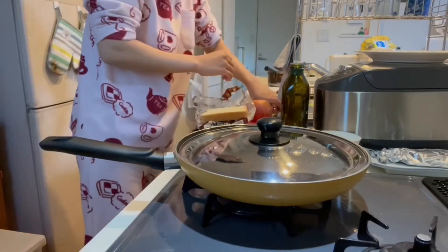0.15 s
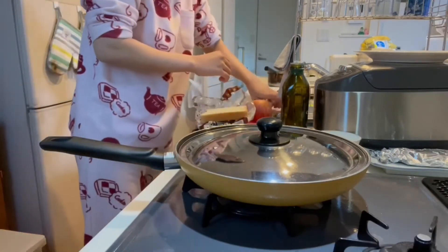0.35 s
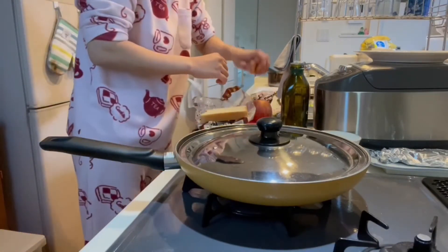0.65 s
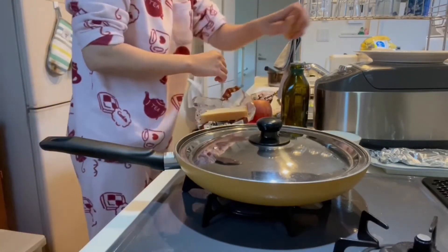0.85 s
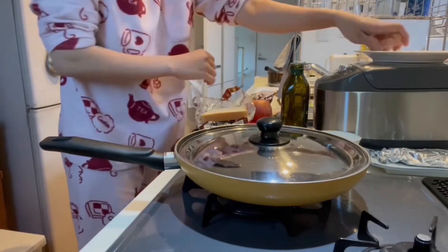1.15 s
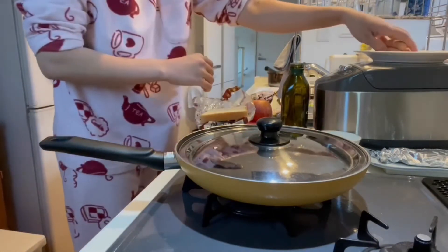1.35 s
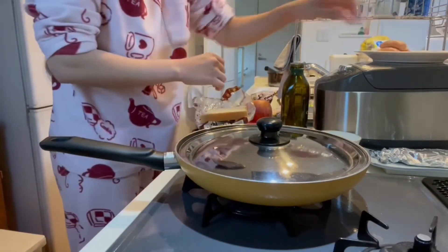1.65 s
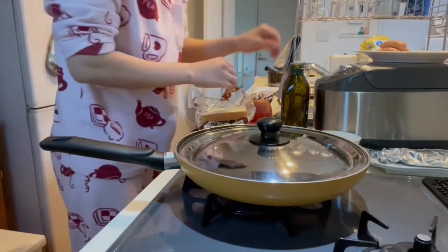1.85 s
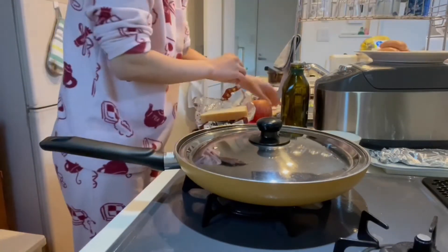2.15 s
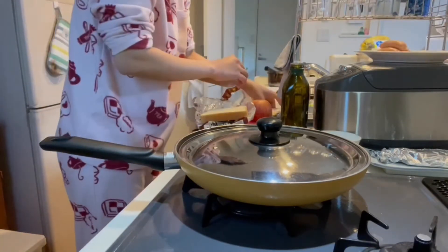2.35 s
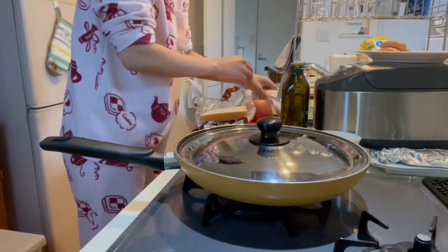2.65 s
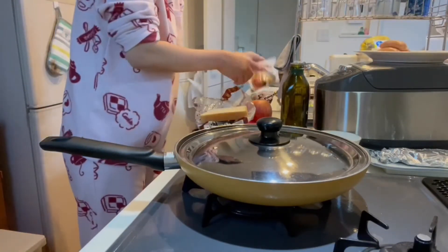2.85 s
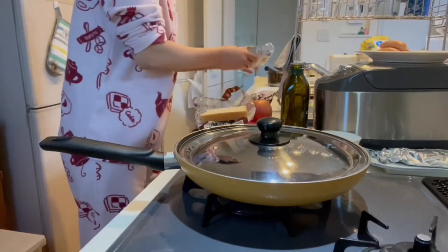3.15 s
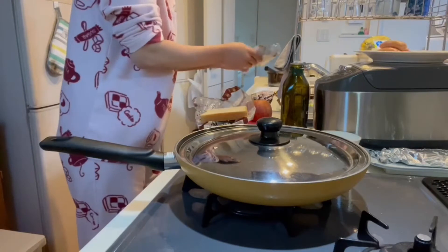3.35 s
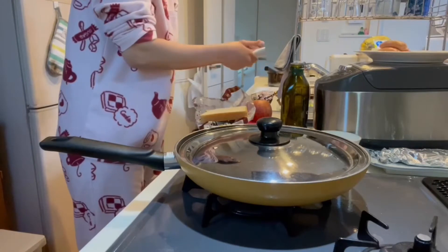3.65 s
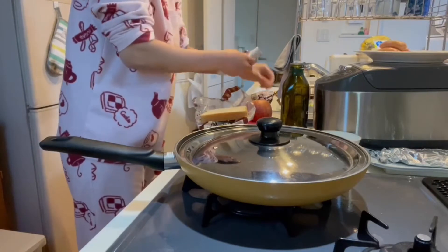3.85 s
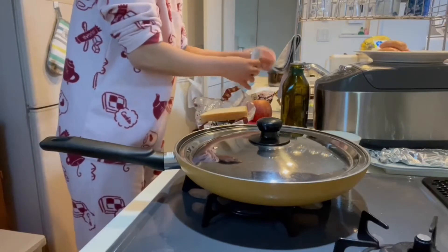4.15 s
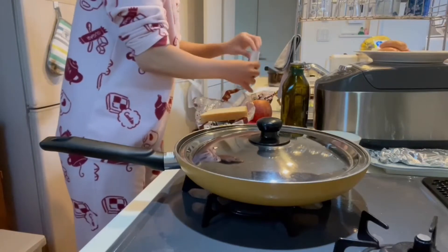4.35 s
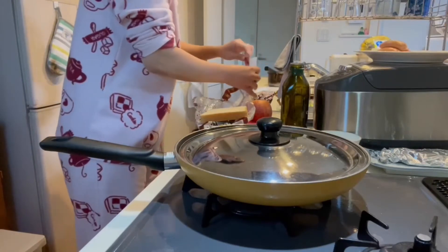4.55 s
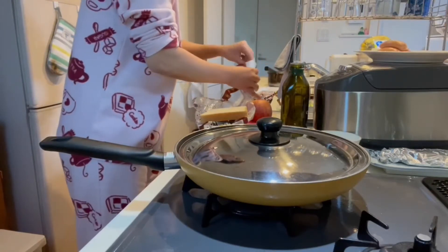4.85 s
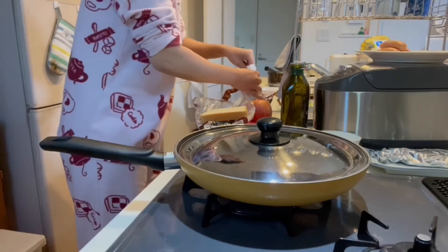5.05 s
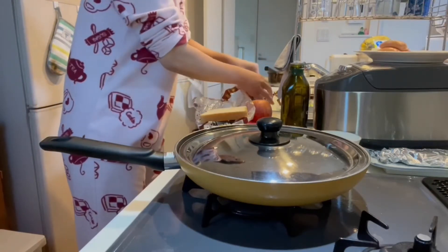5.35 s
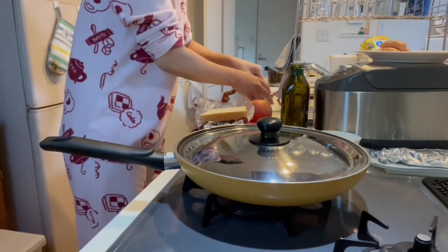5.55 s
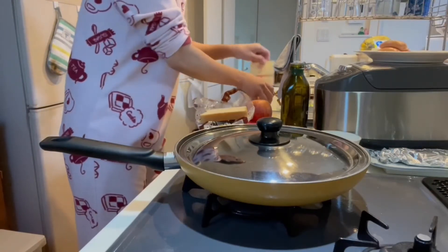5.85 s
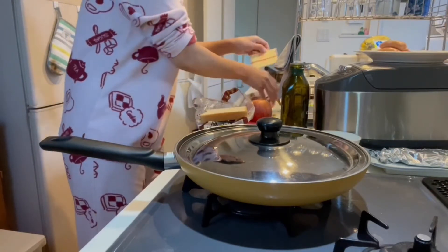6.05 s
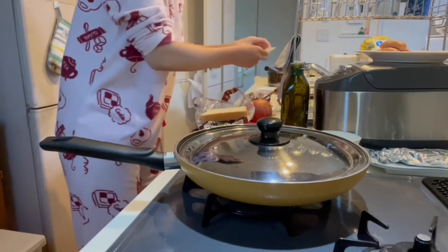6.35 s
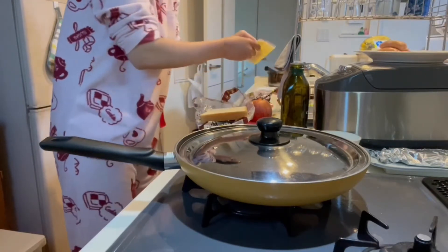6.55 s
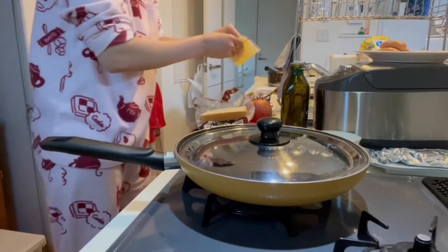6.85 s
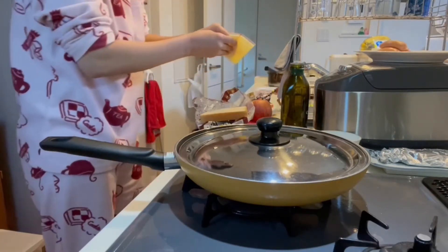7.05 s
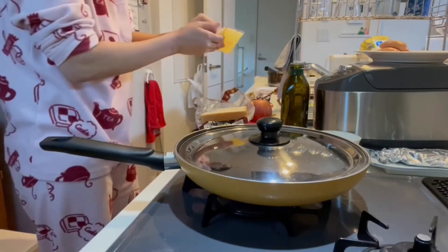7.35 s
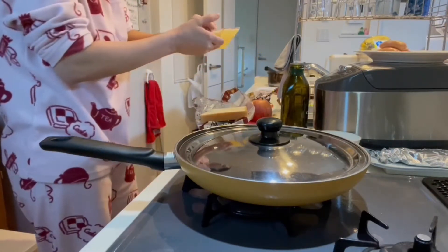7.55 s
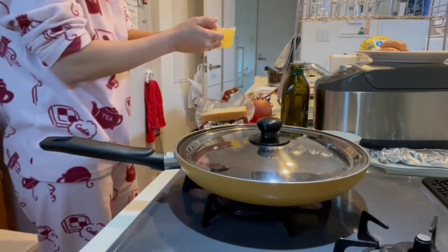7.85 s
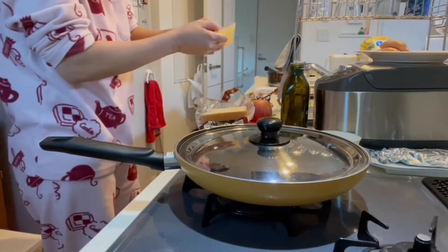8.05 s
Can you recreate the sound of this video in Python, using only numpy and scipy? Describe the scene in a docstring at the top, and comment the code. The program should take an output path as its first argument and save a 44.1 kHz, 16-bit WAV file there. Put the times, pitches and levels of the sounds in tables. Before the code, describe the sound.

Food sizzles quietly in a covered frying pan close to the microphones, a steady hiss dotted with small pops of fat. Beneath it run the low rumble of a gas flame and fan and an appliance hum. Soft thuds come just after 1 second, followed by a faint, brief low tone. From about 2 seconds, thin plastic wrapping rustles a metre behind the pan, snapping sharply around 2.4 and again from 3.1 to 3.4 seconds. Fat spits more clearly near 3.8 seconds. Lighter crinkling continues from 4 to 6 seconds, with small taps, a package dragged over the counter and a soft thud near 6. The handling then thins to a few crackles, and the faint low tone returns near 7.7. At about 8 seconds the wrapper tears open with crisp snaps. The kitchen sounds small, with a short echo.

```python
"""A small kitchen, heard through two spaced microphones close to a frying pan on a gas ring.
Food sizzles quietly under the glass lid: tiny bursts blur to a hiss, and single drops of fat spit.
A metre behind the pan a cook bends thin plastic wrapping, whose creases rustle and snap, and tears
it open at the very end. A package is shuffled about and things are set down with light taps and
soft thuds. Under it all lie the rumble of flame and fan and a low appliance hum."""
import sys
import numpy as np
from scipy import signal
from scipy.fft import rfft, irfft, next_fast_len
from scipy.io import wavfile

SR = 44100
rng = np.random.default_rng(int(sys.argv[2]) if len(sys.argv) > 2 else 0)


def transcribe(u):
    """Save the signal u as a 16-bit wav file named by the first command-line argument.

    u: samples, shape (n,) or (channels, n), limited to [-1, 1]; the rate is SR.
    q: integer samples, one column per channel.
    """
    v = np.clip(np.atleast_2d(u).T, -1, 1)
    q = np.round(v * 32767).astype(np.int16)
    wavfile.write(sys.argv[1], SR, q)


N = 361619
TIME = np.arange(N) / SR


# Colour of the sizzling hiss, with two notches cut into the treble at 8.3 and 12.8 kHz.
# Each row: frequency in Hz, relative level in dB.
SIZZLE_SPECTRUM = [(300, -9), (500, 1), (660, -18.5), (880, 1.5), (1150, 0), (1550, -7.5), (3000, -7.5),
                   (4500, -13), (6500, -12), (8300, -29.5), (10500, -12.5), (12800, -37), (14500, -24.5)]

def sizzle():
    """Countless tiny bursts blur to a hiss; small pops of fat tick above it at random."""
    hiss = scattered(crackle(per_s=2600, spread_db=3.0), decay_s=0.0027)
    ticks = np.zeros((2, N))
    for when, pitch, size in rng.random((36 * N // SR, 3)):  # 36 pops a second
        hz = 1200 * 6 ** pitch
        level_db = -55 + 10 * size ** 3 + at_hz(SIZZLE_SPECTRUM, hz)
        add(ticks, when * N / SR, from_db(level_db) * pop(hz))
    return from_db(-60.5) * coloured(hiss, SIZZLE_SPECTRUM) + ticks


# Fat spitting under the lid. Each row: start in seconds, relative level in dB, pitch in Hz.
FAT_SPITS = [(0.41, -50, 2500), (0.559, -50, 1910), (0.64, -49.5, 5270), (0.741, -55, 6940),
             (1.055, -49.5, 4600), (1.195, -52.5, 7260), (1.334, -45, 1860), (1.37, -45, 2580),
             (1.403, -47, 2200), (1.512, -51, 3450), (1.959, -49.5, 5300), (2.647, -43, 1850),
             (3.701, -39.5, 1930), (3.786, -36, 1620), (3.793, -41, 1530), (3.839, -46.5, 3350),
             (3.998, -46.5, 4460), (6.099, -44.5, 1870), (6.411, -51, 2500), (6.524, -42.5, 1070),
             (6.612, -53, 3530), (7.341, -50.5, 6100), (7.365, -52, 4950), (7.418, -51, 6200)]

def spits():
    """Larger bubbles burst one by one and stand clear of the hiss."""
    out = np.zeros((2, N))
    for start, level_db, hz in FAT_SPITS:
        add(out, start, from_db(level_db) * pop(hz))
    return out


def pop(hz, ring_s=0.0014, scatter_s=0.015, fade_db_per_s=850, crack_db=-8, count=4):
    """A bubble bursts: a dry crack with a brief ping in it, then weaker ones close behind."""
    t = TIME[:SR // 24]
    order = np.arange(count)
    jitter = rng.uniform(-0.494, 0.478, (2, count)) * (order > 0)
    delay_s = scatter_s * (order + jitter)[..., None] / count
    age = np.maximum(t - delay_s, 0)
    envelope = age / ring_s * np.exp(1 - age / ring_s) * from_db(-fade_db_per_s * delay_s)
    ping_hz = hz * (1 + 9e-6 * hz * rng.standard_normal(delay_s.shape))  # small, high bubbles vary most
    ping = np.sin(2 * np.pi * (ping_hz * age + rng.random(delay_s.shape)))
    crack = rms_one(bandpass(rng.standard_normal((2, len(t))), hz / np.sqrt(2), hz * np.sqrt(2)))
    return (envelope * (.9 * ping + from_db(crack_db) * crack[:, None])).sum(axis=1)


# Colour of the crinkle's body and crisp edge, with two notches cut into the treble at 8.3 and 13 kHz.
# Each row: frequency in Hz, relative level in dB.
BODY_COLOUR = [(300, -8), (700, -3), (1050, 1), (1700, -1), (2600, -3), (4000, -6.5), (6000, -37),
               (12000, -83)]
EDGE_COLOUR = [(1500, -9.5), (4000, 1), (6000, 5), (7200, 2.5), (8300, -4.5), (10300, 4), (11500, -1.5),
               (13000, -28), (14800, 0.5), (16000, -35)]
# Fingers bend the film, a metre behind the pan. Each row: start in seconds, length in seconds,
# relative level in dB, extra level of the edge in dB.
FILM_BENDS = [(1.315, 0.088, -54.5, -8), (2.07, 0.15, -52.5, -7), (2.218, 0.098, -43.5, -9.5),
              (2.335, 0.09, -52.5, 11), (2.44, 0.28, -57, -9), (2.816, 0.23, -51.5, -8),
              (3.084, 0.12, -51, 1), (3.224, 0.17, -45.5, -12), (4.161, 0.078, -52, -2.5),
              (4.305, 0.15, -49.5, -6.5), (4.626, 0.18, -47, -5.5), (4.98, 0.086, -48.5, -8.5),
              (5.163, 0.39, -56, -4), (5.509, 0.45, -55.5, 1), (6.055, 0.43, -66.5, -2.5),
              (6.775, 0.051, -59, 2), (7.775, 0.14, -60.5, 10.5)]

def rustle():
    """Small creases give way in clumps for as long as the film is bent."""
    body, edge = np.zeros(N), np.zeros(N)
    for start, length_s, level_db, edge_db in FILM_BENDS:
        bend = swell(start, length_s, attack_s=0.0027, release_s=0.041)
        body += from_db(level_db - 4.5) * bend
        edge += from_db(level_db + edge_db - 5.5) * bend
    creases = crinkle(crackle(per_s=270, spread_db=3.4), decay_s=0.0016, colour_db=2.5)
    return body * coloured(creases, BODY_COLOUR) + edge * coloured(creases, EDGE_COLOUR)


# Creases snap through in the cook's hands. Each row: moment in seconds, relative level in dB,
# extra level of the edge in dB, pitch of the ringing facet in Hz, decay in seconds.
CREASE_SNAPS = [(2.06, -32, -4.5, 2290, 0.0057), (2.31, -31, -25, 1830, 0.0046),
                (2.354, -19, -29, 2630, 0.0027), (2.357, -23.5, -10.5, 1690, 0.0033),
                (2.395, -19, -25, 1000, 0.005), (2.403, -21, -14, 1080, 0.0075),
                (2.447, -33, -23, 2400, 0.0056), (2.48, -19.5, -33, 1090, 0.0012),
                (2.733, -34.5, -3, 1130, 0.0031), (2.853, -32.5, -3.5, 2450, 0.0046),
                (2.972, -32, -7.5, 1260, 0.015), (3.107, -32, -2.5, 4460, 0.0052),
                (3.139, -30, -0.5, 4100, 0.0043), (3.246, -36, 2, 4060, 0.016),
                (3.288, -28.5, -9, 3000, 0.018), (3.299, -21.5, -9, 1660, 0.0062),
                (3.375, -25.5, -11.5, 2550, 0.004), (3.388, -27, -4.5, 1480, 0.018),
                (3.411, -20, -14.5, 1530, 0.0082), (3.56, -40, -3.5, 2770, 0.004),
                (4.309, -24.5, -19, 2850, 0.0026), (4.321, -31, -8, 1860, 0.0058),
                (4.627, -32.5, -9.5, 2520, 0.0044), (4.776, -31, -10, 2080, 0.0056),
                (4.818, -36.5, -5, 2720, 0.0022), (4.825, -33, -2, 2460, 0.0027),
                (4.919, -33, -11.5, 1190, 0.0048), (5.804, -30, -20.5, 1140, 0.012),
                (7.191, -39.5, -7, 2360, 0.0087), (7.211, -33.5, -2, 2200, 0.0034),
                (7.778, -40.5, -1.5, 2170, 0.0087), (8.018, -18.5, -10.5, 2040, 0.0085),
                (8.079, -29, 0, 2460, 0.0081), (8.116, -17.5, -13, 2010, 0.0031)]

def snaps(facet_q=4.6, facet_db=8.0, crack_s=0.0001, crack_db=-7, edge_fade_s=0.069):
    """Small cracks run up to a crease giving way, then die out in an avalanche; a facet of film rings."""
    body, edge = np.zeros((2, N)), np.zeros((2, N))
    t = np.arange(-SR // 25, SR // 12) / SR
    before, after = np.maximum(-t, 0), np.maximum(t, 0)
    knots = t[::60]
    for moment, level_db, edge_db, hz, decay_s in CREASE_SNAPS:
        uneven = from_db(np.interp(t, knots, rng.uniform(-3, 3, len(knots))))
        run_up = .5 * np.exp(-before / (0.68 * decay_s))
        avalanche = np.where(t < 0, run_up, np.exp(-after / decay_s))
        main_crack = from_db(crack_db) * np.exp(-after / crack_s) * (t >= 0)
        cracks = (uneven * avalanche + main_crack) * rng.standard_normal((2, len(t)))
        overtone_hz = hz * rng.uniform(1.51, 2)
        facet = resonance(cracks, hz, facet_q) + .5 * resonance(cracks, overtone_hz, facet_q)
        facet *= from_db(facet_db - at_hz(BODY_COLOUR, hz))  # offsets the sheet's colour at this pitch
        add(body, moment + t[0], from_db(level_db - 11.5) * (cracks + facet))
        crisp = cracks * np.exp(-after / edge_fade_s)  # the first cracks are the crispest
        add(edge, moment + t[0], from_db(level_db + edge_db + 4.0) * crisp)
    return coloured(body, BODY_COLOUR) + coloured(edge, EDGE_COLOUR)


# The pull that opens the wrapper. Each row: time in seconds, relative level of the rip in dB.
TEAR_PULL = [(7.965, -54.5), (8.01, -41.5), (8.05, -40), (8.11, -37), (8.2, -40)]

def tear():
    """The rip swells into a dense run of tiny breaks, and the taut sheet rings with them."""
    pull = from_db(np.interp(TIME, *np.transpose(TEAR_PULL), left=-np.inf))
    breaks = scattered(crackle(per_s=1100, spread_db=2), decay_s=.001)
    body, edge = coloured(breaks, BODY_COLOUR), coloured(breaks, EDGE_COLOUR)
    sheet = resonance(body, hz=2300, q=3.7)
    return pull * (.5 * body + from_db(3) * sheet + from_db(-1) * edge)


# The film's sparkle. Each row: time in seconds, gain of the added treble above 12 kHz in dB.
FILM_SPARKLE = [(3.5, -42), (5.8, -13), (6.8, 15.5), (8, -1.5)]

def wrapping():
    """The thin plastic rustles, snaps and tears, and sparkles more towards the end."""
    film = rustle() + snaps() + tear()
    treble = signal.sosfiltfilt(signal.butter(2, 12000, "high", fs=SR, output="sos"), film)
    return film + treble * from_db(np.interp(TIME, *np.transpose(FILM_SPARKLE)))


# The hollow rasp of a package. Each row: frequency in Hz, relative level in dB.
PACKAGE_SPECTRUM = [(60, 8), (250, 8.5), (450, -0.5), (700, -2.5), (1150, 8.5), (1700, -4), (2400, -1.5),
                    (5000, -9.5), (12000, -48)]
# Pushes behind the pan. Each row: middle in seconds, half length in seconds, relative level in dB.
PACKAGE_PUSHES = [(2.404, 0.013, -42), (4.377, 0.077, -53.5), (5.19, 0.067, -57), (5.58, 0.17, -54),
                  (5.899, 0.068, -41.5), (8.144, 0.049, -67)]

def shuffles():
    """A package sticks and slips as it is dragged over the counter."""
    push = sum(from_db(level_db) * np.exp(-((TIME - middle) / half_s) ** 4)
               for middle, half_s, level_db in PACKAGE_PUSHES)
    slips = scattered(crackle(per_s=240, spread_db=2.5), decay_s=.002)
    return push * coloured(slips, PACKAGE_SPECTRUM)


# Things knock as the cook handles them. Each row: start in seconds, relative level in dB, pitch in Hz.
LIGHT_TAPS = [(2.528, -45.5, 1970), (2.829, -41.5, 1390), (5.034, -43, 970), (5.07, -43.5, 1080),
              (5.181, -36.5, 1550), (5.305, -46, 1700), (5.668, -42, 1370), (6.355, -53.5, 2160)]

def taps(decay_s=0.0092, rise_s=0.00092):
    """A dry contact: a short spatter through one damped resonance, with a broad knock around it."""
    out, t = np.zeros((2, N)), TIME[:SR // 12]
    envelope = np.exp(-t / decay_s) * (1 - np.exp(-t / rise_s))
    for start, level_db, hz in LIGHT_TAPS:
        spatter = rng.standard_normal((2, len(t)))
        ring = rms_one(resonance(spatter, hz, q=4))
        knock = rms_one(bandpass(spatter, hz / 2, 2 * hz))
        add(out, start, from_db(level_db) * envelope * (.5 * ring + knock))
    return out


# Things set down on the counter and appliances. Each row: start in seconds, relative level in dB,
# pitch in Hz, seconds to fade by 60 dB.
SOFT_THUDS = [(1.028, -48.5, 133.8, 0.55), (1.166, -43, 158, 0.14), (1.175, -47, 76, 0.2),
              (1.185, -41.5, 126, 0.3), (2.369, -50.5, 232.5, 0.33), (3.41, -46, 291, 0.091),
              (5.929, -43, 124, 0.12), (5.981, -47.5, 72.6, 0.25), (8.078, -44, 538, 0.24),
              (8.151, -42.5, 279, 0.13)]

def thuds(contact_s=0.0025, scuff_s=0.012):
    """A soft contact swells into one low mode, with a dull scuff."""
    out, t = np.zeros(N), TIME[:SR // 2]
    rise = 1 - np.exp(-t / contact_s)
    for start, level_db, hz, t60 in SOFT_THUDS:
        scuff = rms_one(bandpass(rng.standard_normal(len(t)), 45, 330)) * np.exp(-t / scuff_s)
        boom = np.sin(2 * np.pi * hz * t) * from_db(-60 * t / t60)
        add(out, start, from_db(level_db + 10.0) * rise * (boom + from_db(-10.5) * scuff))
    return out


# A faint tone in the background. Each row: start in seconds, length in seconds, top pitch in Hz,
# relative level in dB.
LOW_TONES = [(1.337, 0.307, 225.6, -51.5), (7.667, 0.37, 324, -54.5)]

def low_tone(arch_octaves=.1, waver_octaves=0.053):
    """Twice a low, wavering tone rises and sinks in an arch."""
    out = np.zeros(N)
    for start, length_s, top_hz, level_db in LOW_TONES:
        from_middle = np.clip(2 * (TIME - start) / length_s - 1, -1, 1)
        hz = top_hz * 2 ** (-arch_octaves * from_middle ** 2 + waver_octaves * drift(30))
        gain = from_db(level_db + 2 * drift(7.2)) * swell(start, length_s, attack_s=0.033, release_s=0.037)
        out += gain * np.sin(2 * np.pi * np.cumsum(hz) / SR)
    return out


# The gas ring and the fan. Each row: frequency in Hz, relative level in dB.
BURNER_SPECTRUM = [(20, -17), (35, -16), (55, -1.5), (115, 4), (160, -7), (210, -4), (300, -6.5),
                   (380, -17), (520, -29), (700, -18), (2000, -84)]
# Appliance and fan tones in the room. Each row: pitch in Hz, RMS level in dB, waver in dB.
MOTOR_TONES = [(49.4, -54.5, 4.5), (95.5, -60, -1), (244.7, -69.5, -0.5), (299.7, -68.5, -0.5)]

def burner_and_hum():
    """Flame and fan rumble, with motor tones that waver in level and phase."""
    rumble = microphones(coloured(rng.standard_normal((2, N)), BURNER_SPECTRUM))
    hum = np.zeros(N)
    for hz, level_db, waver_db in MOTOR_TONES:
        gain = np.sqrt(2) * from_db(level_db + waver_db * drift(18))
        hum += gain * np.sin(2 * np.pi * hz * TIME + 0.04 * waver_db * drift(3.1))
    return from_db(-52.5) * rumble + hum


# The ring of the kitchen. Each row: frequency in Hz, seconds to fade by 60 dB.
KITCHEN_DECAY = [(200, 0.66), (1000, 0.096), (3000, 0.33), (15000, 0.16)]

def room_tail():
    """Dense stereo reflections that linger longest in the bass; unit energy."""
    t = TIME[:SR // 2]
    tail, edges = 0, np.geomspace(80, 18000, 8)
    for low, high in zip(edges, edges[1:]):
        band = bandpass(rng.standard_normal((2, len(t))), low, high)
        t60 = at_hz(KITCHEN_DECAY, np.sqrt(low * high))
        tail = tail + band * from_db(-60 * t / t60) * (t > .003)
    return rms_one(tail) / np.sqrt(len(t))


def kitchen(x, tail_db, wander_per_s=3):
    """A small hard room; the echo pattern changes as the source shifts about."""
    place = 2 * np.pi * wander_per_s * TIME
    echoes = sum(signal.oaconvolve(x * share, room_tail(), axes=1)[:, :N]
                 for share in (np.cos(place), np.sin(place)))
    return x + from_db(tail_db) * echoes


# How alike the two microphones hear the room. Each row: frequency in Hz, correlation from -1 to 1.
MICROPHONE_LIKENESS = [(60, 0.78), (130, 1), (290, 0.22), (640, -0.18), (1400, 0.35), (3100, 0.14),
                       (6800, -0.097)]

def microphones(x):
    """Two spaced microphones hear long waves alike and short ones apart."""
    size = next_fast_len(N)
    alike = np.clip(at_hz(MICROPHONE_LIKENESS, np.arange(size // 2 + 1) * SR / size), -1, 1)
    shares = np.sqrt([(1 + alike) / 2, (1 - alike) / 2])
    mid, side = irfft(rfft(x, size) * shares, size)[:, :N]
    return np.array([mid + side, mid - side])


def crackle(per_s, spread_db):
    """Random clicks, many small and a few large; unit power."""
    clicks, at = np.zeros(N), np.flatnonzero(rng.random(N) < per_s / SR)
    sizes = np.minimum(rng.standard_exponential(N), 3.5)
    clicks[at] = from_db(spread_db * sizes[at])
    return rms_one(clicks)


def scattered(clicks, decay_s):
    """Every click reaches the two microphones by a brief scatter of paths of its own; power is kept."""
    pole = np.exp(-1 / (decay_s * SR))
    power = signal.lfilter([1 - pole], [1, -pole], clicks ** 2 + 1e-18)
    return np.sqrt(power) * rng.standard_normal((2, N))


def crinkle(clicks, decay_s, colour_db, bands=9):
    """Scattered clicks, each with a colour of its own; unit power."""
    out, edges = 0, np.geomspace(300, 18000, bands + 1)
    for low, high in zip(edges, edges[1:]):
        gains = from_db(colour_db * rng.standard_normal(N))
        out = out + bandpass(scattered(clicks * gains, decay_s), low, high)
    return rms_one(out)


def swell(start, length_s, attack_s, release_s):
    """Attack, hold and release."""
    since = np.maximum(TIME - start, 0)
    return (1 - np.exp(-since / attack_s)) * np.exp(-np.clip((since - length_s) / release_s, 0, 20))


def drift(per_s):
    """A slow random wander with a spread of about one."""
    knots = rng.standard_normal(2048)
    return np.interp(TIME * per_s, np.arange(len(knots)), knots)


def coloured(x, spectrum):
    """Give x a smooth spectrum; white input keeps its power."""
    size = next_fast_len(N + 4096)
    gain = rms_one(from_db(at_hz(spectrum, np.arange(size // 2 + 1) * SR / size)))
    return irfft(rfft(x, size) * gain, size)[..., :N]


def bandpass(x, low_hz, high_hz):
    """Keep one band, with gentle slopes."""
    return signal.sosfilt(signal.butter(2, [low_hz, high_hz], "band", fs=SR, output="sos"), x)


def resonance(x, hz, q):
    """One damped mode driven by x."""
    return signal.lfilter(*signal.iirpeak(hz, q, fs=SR), x)


def at_hz(points, hz):
    """Read a table on a log-frequency axis."""
    known, values = np.transpose(points)
    return np.interp(np.log(hz + 1e-3), np.log(known), values)


def add(out, start_s, sound):
    """Mix a short sound in at its start time."""
    start = int(np.clip(start_s * SR, 0, N - 1))
    out[..., start:start + sound.shape[-1]] += sound[..., :N - start]


def from_db(db):
    """Decibels to gain."""
    return 10 ** (np.asarray(db) / 20)


def rms_one(x):
    """Scale to unit power."""
    return x / np.sqrt(np.mean(x ** 2) + 1e-20)


def scene():
    """The pan is near the microphones; the cook's hands, a metre behind it, carry a little more room."""
    hands = kitchen(wrapping() + taps() + shuffles(), tail_db=-4.0)
    pan = kitchen(sizzle() + spits(), tail_db=-5.0)
    room = microphones(pan + hands)
    lows = burner_and_hum() + thuds() + low_tone()
    return room * from_db([[-.2], [.2]]) + lows * from_db([[-.6], [.6]])  # both lean slightly right


def record(dry):
    """The treble is cut steeply above 16 kHz."""
    return signal.sosfilt(signal.ellip(10, .1, 80, 16000, fs=SR, output="sos"), dry)


dry = scene()
out = record(dry)
transcribe(out)
```